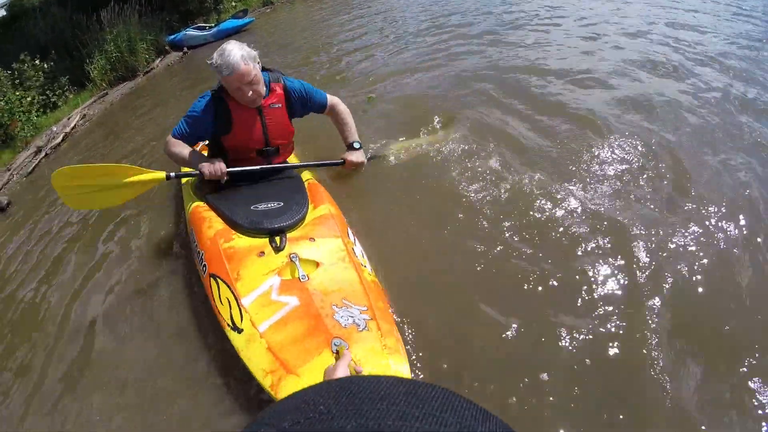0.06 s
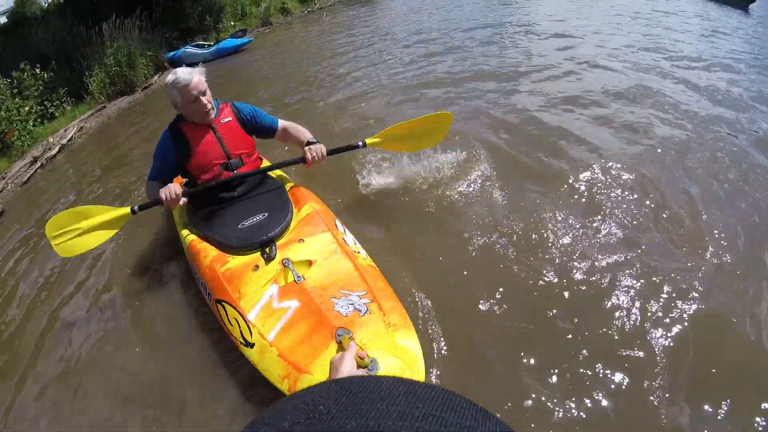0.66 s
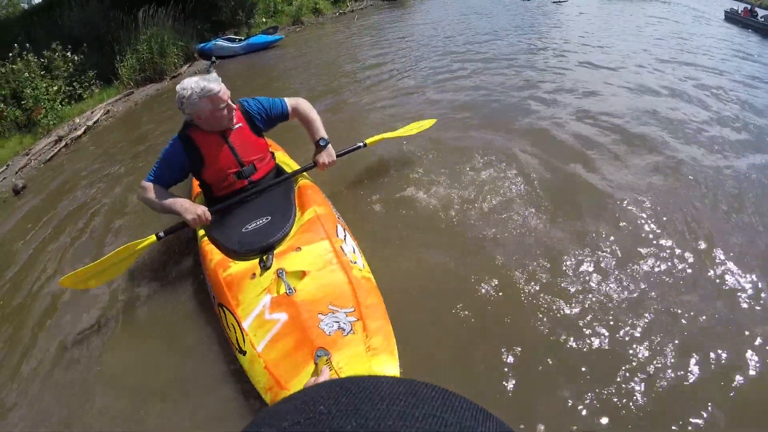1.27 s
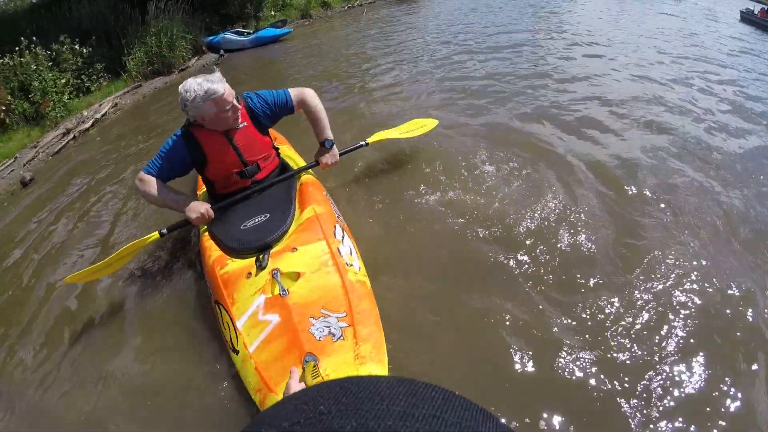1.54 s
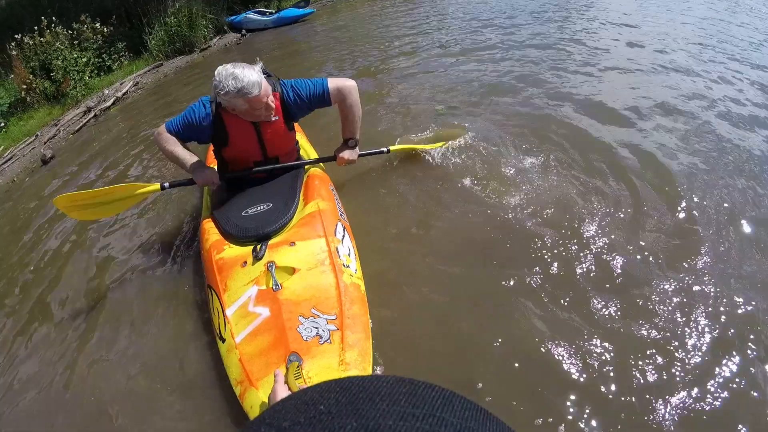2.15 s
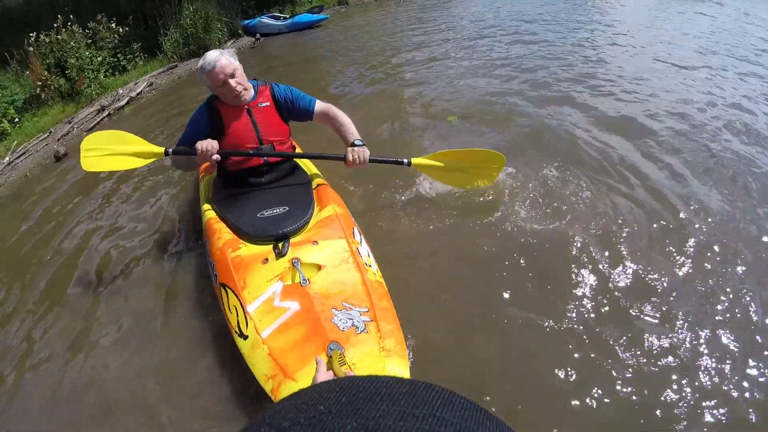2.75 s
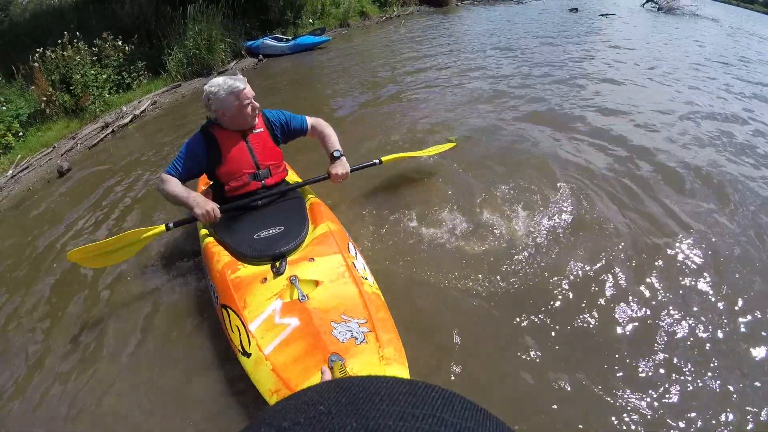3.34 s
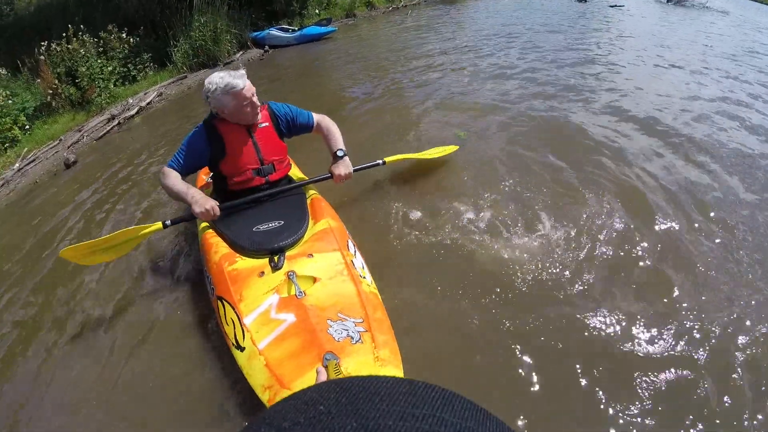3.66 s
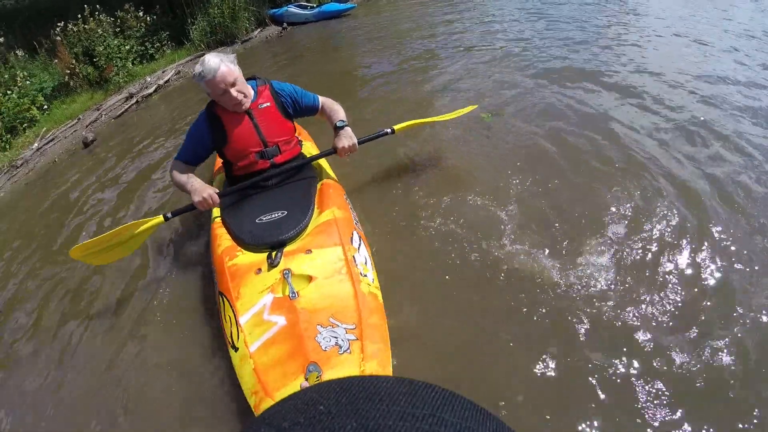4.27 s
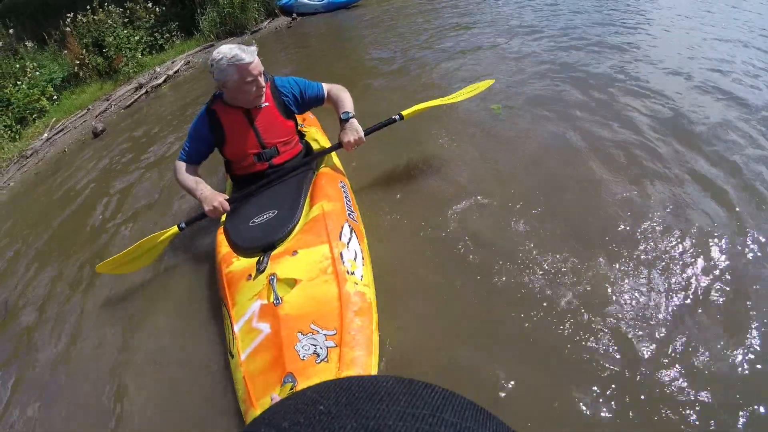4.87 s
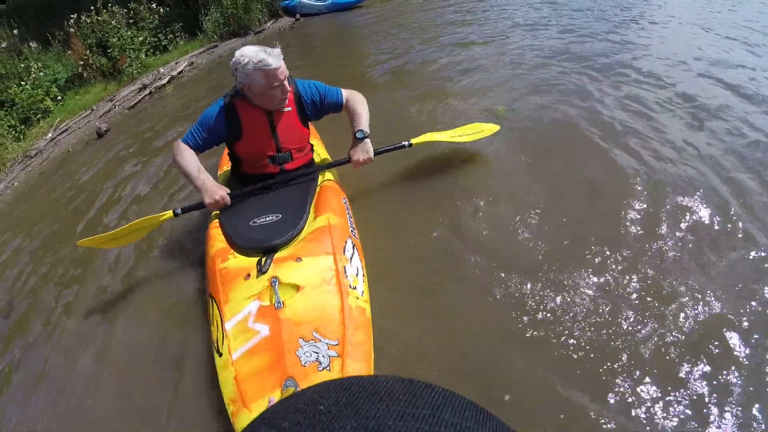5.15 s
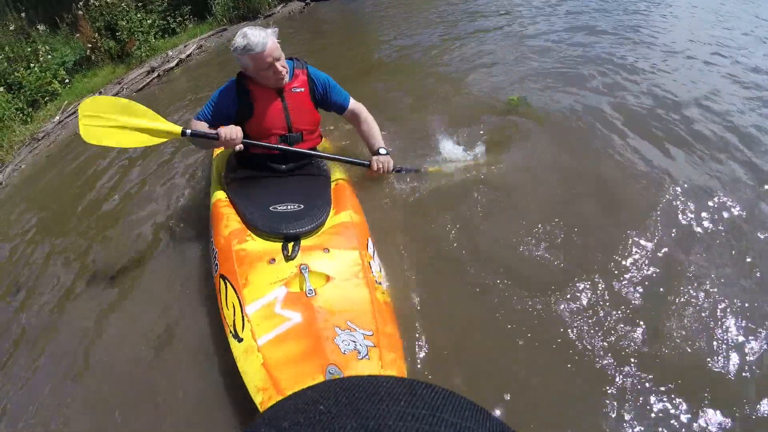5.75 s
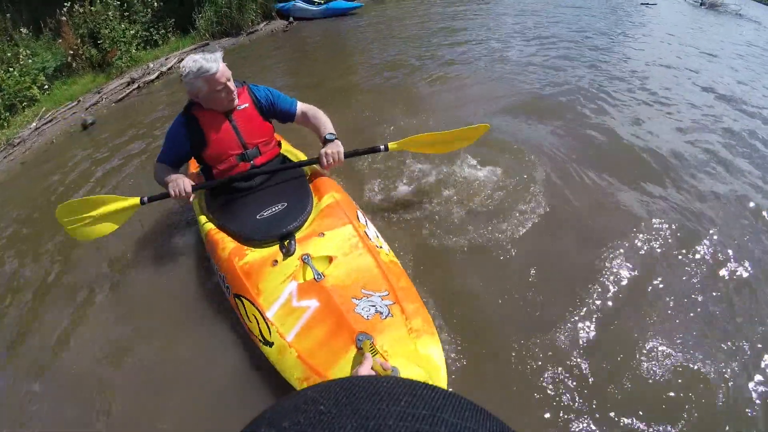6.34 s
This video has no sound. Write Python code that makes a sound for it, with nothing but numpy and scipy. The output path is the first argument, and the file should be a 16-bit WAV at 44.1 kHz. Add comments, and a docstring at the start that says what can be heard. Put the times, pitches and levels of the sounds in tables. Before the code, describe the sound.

A kayak paddle works through shallow river water, heard close up from the bow. The first stroke comes right away, with gulping bubbles, a low knock on the hull and a splash at about 0.5 seconds that trails off in drips. A faint distant motor hums briefly around 1 second. At 2 seconds the paddle clacks, and the second stroke splashes and gurgles until about 3.3 seconds. Drops click sharply on the microphone's case near 3.2 and 3.9 seconds, and water laps softly around 4.5 seconds. Another clack at 5.3 seconds and a sharp drop hit at 5.5 lead into the third, loudest stroke, with a low thump at 5.7 seconds and splashing and dripping to the end, near 6.4 seconds. Throughout, wind buffets the microphone in uneven gusts, over a low distant drone and a soft hiss of river and leaves.

```python
"""A kayaker paddles three strokes through shallow river water, close to a small camera on the bow.
The first stroke opens the scene: the paddle knocks the hull, bubbles resonate, a splash falls and drips.
A far motor hums briefly near 1 s. At 2 s the paddle clacks as it swings down for the second stroke;
from 3 s a few drops strike the camera. Another clack, just after 5 s, leads into the third stroke.
Throughout, wind buffets the microphone over a low drone, and the housing resonates near 5 kHz."""
import sys
import numpy as np
from scipy import signal
from scipy.io import wavfile
from scipy.ndimage import uniform_filter1d

SR = 44100
rng = np.random.default_rng(int(sys.argv[2]) if len(sys.argv) > 2 else 0)


def wrap_up_sound(samples):
    """Save the sound to the file named by the first command line argument, as 16-bit audio."""
    columns = np.atleast_2d(samples).T
    # keep every value between -1 and 1, then stretch to whole-number steps
    tamed = np.clip(columns, -1, 1)
    steps = np.round(tamed * 32767).astype(np.int16)
    wavfile.write(sys.argv[1], SR, steps)


N = 282587
T = np.arange(N) / SR

# the blade tears the water or a wave laps the hull:
# peak_s, splash_db, rise_s, fall_s, churn_relative_db, spray_relative_db
SPLASH_EVENTS = [(0.089, -44, 0.12, 0.13, 5, 0.5), (0.384, -42, 0.09, 0.13, 5.5, -2),
                 (0.49, -35.5, 0.034, 0.041, 3, -6.5), (.82, -52, 0.076, 0.13, 0, 3),
                 (2.14, -56.5, 0.045, 0.18, -10.5, 12), (2.369, -45, 0.033, 0.66, 4, 0.5),
                 (2.48, -42.5, 0.14, 0.072, -3, -3.5), (2.585, -47.5, 0.031, 0.062, 14, -16),
                 (2.94, -42.5, 0.18, 0.092, -18, -4), (3.281, -46, 0.058, 0.092, -12, -4),
                 (3.949, -60.5, 0.42, 0.4, 13.5, 8.5), (4.465, -47, 0.074, 0.037, 2.5, 2),
                 (4.6, -50.5, 0.04, 0.14, 1, 2.5), (5.195, -49, 0.03, 0.016, 11.5, -5),
                 (5.651, -39, 0.16, 0.15, -11, -0.5), (5.728, -35, 0.028, 0.033, -3, 0.5),
                 (5.769, -33.5, 0.046, .03, 4.5, -32), (5.901, -46, 0.014, 0.18, 10.5, 0.5),
                 (6.085, -37.5, 0.052, 0.093, -2.5, 0.5), (6.32, -46, 0.14, 0.85, 4, 1)]


def strokes():
    """Incoherent sources add in power: each splash builds, decays and leaves the water bubbling."""
    calm_db = (-57.5, -60.5, -60)  # the river between strokes: churn, splash, spray
    settle_db, settle_s = -13, 0.59
    power = gain_of(calm_db)[:, None] ** 2 * np.ones(N)
    for peak_s, db, rise_s, fall_s, churn_rel_db, spray_rel_db in SPLASH_EVENTS:
        surge = np.exp(-2 * peak_distance(peak_s, rise_s, fall_s))
        settling = gain_of(settle_db) ** 2 * np.exp(-2 * peak_distance(peak_s, rise_s, settle_s))
        power += gain_of([[db + churn_rel_db], [db], [db + spray_rel_db]]) ** 2 * (surge + settling)
    churn_db, splash_db, spray_db = 10 * np.log10(power)
    return churn(churn_db) + splash(splash_db) + spray(spray_db)


# spectrum of the water behind the blade: frequency_hz, level_db
CHURN_SPECTRUM = [(150, -24.5), (320, 4), (900, 3.5), (2000, -41.5)]


def churn(level_db):
    """Air entrainment: the blade drags under large bubbles, which resonate low and gurgle."""
    cloud = bubbles(269.3, 1168, per_s=340, t60_cycles=18, spread_db=2)
    gurgle = evened(coloured(cloud, CHURN_SPECTRUM)) + gain_of(-16) * noise(CHURN_SPECTRUM)
    return steadied(gurgle, seconds=0.065) * gain_of(level_db + 2)


# spectrum of thrown water landing: frequency_hz, level_db
SPLASH_SPECTRUM = [(500, 3.5), (1000, -2.5), (1700, 0.5), (4000, -10), (7000, -20)]


def splash(level_db):
    """Impact and bubble resonance: thrown water patters back, and small bubbles tinkle."""
    density = crowding(level_db)
    cloud = bubbles(894, 3590, per_s=420 * density, t60_cycles=24, spread_db=4)
    tinkle = steadied(coloured(cloud, SPLASH_SPECTRUM), seconds=0.048)
    landings = gain_of(-1) * patter(per_s=70 * density, t60_s=0.047) * noise(SPLASH_SPECTRUM)
    return steadied(tinkle + landings, seconds=0.043) * gain_of(level_db + 3)


# spectrum of fine droplets: frequency_hz, level_db
SPRAY_SPECTRUM = [(1500, -21.5), (3500, -0.5), (9000, -4), (15000, -11)]


def spray(level_db):
    """Resonant pitch rises as radius falls: the tiniest bubbles fizz between droplet ticks."""
    density = crowding(level_db)
    cloud = bubbles(3310, 11380, per_s=900 * density, t60_cycles=76, spread_db=3.5)
    fizz = gain_of(-5) * steadied(coloured(cloud, SPRAY_SPECTRUM), seconds=0.047)
    ticks = patter(per_s=110 * density, t60_s=0.03) * noise(SPRAY_SPECTRUM)
    return steadied(ticks + fizz, seconds=0.024) * gain_of(level_db - 3.5)


# gulps of trapped air, with short water slaps and a low paddle knock on the hull:
# start_s, level_db, pitch_hz, t60_s
GULPS_AND_KNOCKS = [(.073, -19, 566, 0.028), (0.124, -6.5, 335, 0.011), (.269, -12.5, 312, 0.0099),
                    (0.27, -19.5, 520, 0.073), (.270, -26, 794, 0.053), (0.338, -9.5, 149, 0.074),
                    (.331, -19, 514, 0.09), (.368, -18, 390, 0.061), (.471, -21, 1630, 0.03),
                    (0.5305, -14.5, 830, 0.024), (1.2568, -28.5, 830, 0.045), (2.057, -22, 820, 0.044),
                    (2.197, -29.5, 1390, 0.036), (2.424, -19, 800, 0.013), (2.429, -12, 820, 0.003),
                    (2.568, -22, 800, 0.044), (2.5764, -11, 308, 0.031), (2.595, -18.5, 875, 0.028),
                    (2.594, -15, 477, 0.02), (4.2575, -26, 695, 0.044), (4.43, -15.5, 890, 0.012),
                    (4.528, -25, 690, 0.02), (5.252, -20.5, 863, 0.027), (5.385, -25.5, 2510, 0.01),
                    (5.656, -21.5, 790, 0.057), (5.718, -14, 234, 0.13), (5.73, -3, 119, 0.083),
                    (5.757, -16.5, 870, 0.025), (5.79, -24, 824, 0.044), (5.801, -7, 169, 0.068),
                    (5.852, -10.5, 285, 0.034), (5.87, -11, 314, 0.052), (6.052, -15, 1256, 0.038),
                    (6.1, -20.5, 393, 0.18), (6.24, -8.5, 133, 0.053), (6.249, -15, 304, 0.065)]


def gulps_and_knocks():
    """Damped resonance: each gulp, slap or hull knock is a rising, decaying tone, slightly scattered."""
    direct = np.zeros(N)
    for start_s, db, hz, t60_s in GULPS_AND_KNOCKS:
        ring = bubble(hz, t60_s, octaves_per_s=8, onset_cycles=0.045 * t60_s * hz)
        add(direct, start_s, gain_of(db) * ring)
    scatter = burst(t60_s=0.007) * rng.standard_normal(SR // 8)
    scattered = signal.oaconvolve(direct, scatter / np.linalg.norm(scatter))[:N]
    return direct + gain_of(-16) * scattered


# clacks and scrapes of the paddle: start_s, edge_db, body_db, t60_s
PADDLE_CONTACTS = [(0.1224, -47, -21.5, 0.0059), (2.0579, -33, -33, 0.028), (2.07, -25, -42, 0.016),
                   (2.073, -31.5, -29.5, 0.077), (2.08, -31, -21.5, 0.035), (2.093, -53, -27.5, 0.048),
                   (5.253, -41, -29, 0.0099), (5.258, -18, -23, 0.016), (5.272, -35.5, -46, 0.044),
                   (5.286, -39.5, -35, 0.061)]
# spectra of its bright edge and hollow body: frequency_hz, level_db
EDGE_SPECTRUM = [(800, -22), (5300, -9.5), (7500, -11.5), (15000, -20)]
BODY_SPECTRUM = [(300, -3), (900, -6), (1250, -4), (1750, 8.5), (2650, -4.5), (3200, 2), (8000, -14.5)]


def clacks():
    """Impact excitation: each hard contact sounds the paddle's edge and body, then rebounds once."""
    rebound_s, rebound_db = 0.0065, -5.5
    edge, body = np.zeros((2, N))
    for start_s, edge_db, body_db, t60_s in PADDLE_CONTACTS:
        for delay_s, contact_db in ((0, 0), (rebound_s, rebound_db)):
            add(edge, start_s + delay_s, gain_of(edge_db + contact_db) * burst(t60_s))
            add(body, start_s + delay_s, gain_of(body_db + contact_db) * burst(t60_s))
    bright = gain_of(-0.3) * edge * steadied(noise(EDGE_SPECTRUM), seconds=0.0026)
    hollow = body * steadied(noise(BODY_SPECTRUM), seconds=0.0085)
    return bright + hollow


# drops landing on the water nearby: start_s, strength_db, plop_relative_db
DRIPS = [(0.368, -26.5, 4), (0.535, -22, 2.5), (.725, -30.5, 3), (0.751, -31.5, -7), (0.841, -28, -4),
         (.9594, -33, 1), (.982, -29.5, -13), (1.2114, -30, -15), (2.381, -24.5, 4.5), (2.4794, -27, -6),
         (2.7666, -29, 5.5), (2.856, -28, 0), (3.1383, -31, -2), (3.1921, -26, -14), (3.234, -29.5, 5),
         (3.5551, -29, -7), (3.702, -32, 7.5), (4.293, -28, -13), (5.2214, -36, 10), (5.437, -27, 6.5),
         (5.644, -22, 7.5), (6.074, -17.5, 1.5), (6.1, -24.5, 11)]


def drips():
    """Drop impact: a tick on landing, a short lower plop, and one trapped bubble that plinks."""
    tick, plop, plinks = np.zeros((3, N))
    pitches_hz = rng.uniform(1384, 4220, len(DRIPS))
    for (start_s, db, plop_db), hz in zip(DRIPS, pitches_hz):
        add(plinks, start_s, gain_of(db - 7.5) * bubble(hz, t60_s=0.016))
        add(tick, start_s, gain_of(db - 7) * burst(t60_s=0.009))
        add(plop, start_s, gain_of(db + plop_db - 7) * burst(t60_s=0.02))
    ticks = tick * steadied(noise(SPRAY_SPECTRUM), seconds=0.0043)
    plops = plop * steadied(noise(SPLASH_SPECTRUM), seconds=0.004)
    return ticks + plops + plinks


# drops striking the camera case: start_s, strength_db
CASE_STRIKES = [(3.187, -14), (3.8997, -5), (5.5057, 6), (5.513, -1), (5.9957, -3)]
# response of the struck case: frequency_hz, gain_db
CASE_RESPONSE = [(3500, -11), (5600, -0.5), (8200, -5.5), (12500, -3.5), (15000, -14)]


def case_pings():
    """Impulse response: a drop on the case gives one sharp click, then a brief spatter."""
    strikes = np.zeros(N)
    for start_s, db in CASE_STRIKES:
        strike = gain_of(-20) * burst(t60_s=0.011) * rng.standard_normal(SR // 8)
        strike[0] = 1  # the click ahead of the spatter
        add(strikes, start_s, gain_of(db - 6) * strike)
    return coloured(strikes, CASE_RESPONSE)


# gusts on the microphone: peak_s, strength_db, length_s
WIND_GUSTS = [(.01, -15.5, 0.021), (0.124, -13.5, 0.02), (0.267, -15, 0.036), (0.598, -24.5, 0.028),
              (1.139, -16.5, 0.011), (2.071, -10, 0.007), (2.197, -18, 0.014), (2.42, -15, 0.036),
              (2.493, -12.5, 0.018), (2.87, -18.5, 0.025), (3.62, -18.5, 0.053), (3.96, -19.5, 0.027),
              (4.044, -14, 0.0056), (4.77, -16.5, 0.01), (4.952, -10.5, 0.016), (5.202, -22, .025),
              (5.307, -19.5, 0.024), (5.477, -18.5, 0.057), (5.682, -11.5, 0.042), (5.73, -19, 0.024),
              (5.821, -11.5, 0.038), (6.248, -12.5, 0.011), (6.342, -11.5, 0.052)]


def wind_strength_db():
    """Power summation: bell-shaped gusts, quicker to rise than to fall, ride on a wandering breeze."""
    breeze_db, wander_db, wander_s = -26.5, 2.5, 0.091
    knots_s = np.arange(0, T[-1] + wander_s, wander_s)
    wander = np.interp(T, knots_s, rng.standard_normal(len(knots_s)))
    power = gain_of(breeze_db + wander_db * wander) ** 2
    for peak_s, db, length_s in WIND_GUSTS:
        distance = peak_distance(peak_s, rise_s=0.95 * length_s, fall_s=1.84 * length_s)
        power += gain_of(db) ** 2 * np.exp(-distance ** 2)
    return 10 * np.log10(power)


# spectra of slow wind pressure and of faster eddies: frequency_hz, level_db
RUMBLE_SPECTRUM = [(10, -7.5), (42, 3), (110, -6.5), (400, -39.5), (3000, -81)]
EDDY_SPECTRUM = [(40, -4.5), (160, 12.5), (320, -7.5), (3000, -54)]


def wind():
    """Turbulence: pressure pulses hit the microphone, and strong gusts break into faster eddies."""
    strength_db = wind_strength_db()
    pulses = impacts(per_s=770, spread_db=4.5)
    rumble = steadied(coloured(pulses, RUMBLE_SPECTRUM), seconds=0.26)
    eddies = steadied(coloured(pulses, EDDY_SPECTRUM), seconds=1.0)
    return rumble * gain_of(strength_db - 1.5) + eddies * gain_of(1.305 * strength_db - 10.5)


# glide of a far motor: time_s, pitch_hz, level_db
MOTOR_GLIDE = [(.6, 212.9, -37.5), (.9, 222.9, -34.5), (1.2, 230.7, -41)]


def motor():
    """A periodic source: one rising tone, carried briefly over the water."""
    turns = np.cumsum(curve(MOTOR_GLIDE, column=1)) / SR
    audible = (T > MOTOR_GLIDE[0][0]) & (T < MOTOR_GLIDE[-1][0])
    fade = uniform_filter1d(audible.astype(float), SR // 10)
    return np.sin(2 * np.pi * turns) * gain_of(curve(MOTOR_GLIDE, column=2)) * fade


# slow swell of the distant drone: time_s, level_db
DRONE_SWELL = [(1.7, -35), (3.9, -33), (6.4, -33)]
# spectra of the drone and of river and leaves: frequency_hz, level_db
DRONE_SPECTRUM = [(40, -15), (100, 4.5), (245, -0.5), (330, -20.5), (1500, -97.5)]
RUSTLE_SPECTRUM = [(350, -2.5), (1500, -8.5), (2500, -18.5), (7500, -28), (15000, -48)]


def outdoors():
    """Ambient noise: a low distant drone under the soft broadband hiss of river and leaves."""
    drone = gain_of(curve(DRONE_SWELL, column=1)) * noise(DRONE_SPECTRUM)
    return drone + gain_of(-45.5) * noise(RUSTLE_SPECTRUM)


def bubble(hz, t60_s, octaves_per_s=4.1, onset_cycles=0.03):
    """A damped oscillator that climbs in pitch, as a bubble does when it nears the surface."""
    t = np.arange(int(t60_s * SR) + 1) / SR
    turns = np.cumsum(hz * 2 ** (octaves_per_s * t)) / SR
    onset = 1 - np.exp(-turns / onset_cycles)
    return np.sin(2 * np.pi * turns) * np.exp(-np.log(1000) * t / t60_s) * onset


def bubbles(low_hz, high_hz, per_s, t60_cycles, spread_db, sizes=48):
    """Constant-Q resonators: in a cloud of bubbles of many sizes, the small ones die sooner."""
    clicks = impacts(per_s, spread_db)
    size_index = rng.integers(0, sizes, N)
    rings = [bubble(hz, t60_cycles / hz) for hz in np.geomspace(low_hz, high_hz, sizes)]
    cloud = np.zeros(N)
    for i in np.flatnonzero(clicks):
        add(cloud, i / SR, clicks[i] * rings[size_index[i]])
    return evened(cloud)


def impacts(per_s, spread_db):
    """A Poisson process: random clicks of either sign, many small and a few large."""
    size = gain_of(spread_db * np.minimum(rng.exponential(1, N), 4))
    return size * rng.choice([-1, 1], N) * (rng.random(N) < per_s / SR)


def patter(per_s, t60_s):
    """Shot-noise envelope of rms 1: separate ticks when drops are few, a smooth wash when many."""
    energy = impacts(per_s, spread_db=4.5) ** 2 / per_s
    power = signal.oaconvolve(energy, burst(t60_s) ** 2)[:N]
    return evened(np.sqrt(abs(power)))


def crowding(level_db, reference_db=-49):
    """A power law: harder stirring multiplies the rate of drops and bubbles."""
    return gain_of(level_db - reference_db) ** 1.44


def burst(t60_s, rise_s=0.00016):
    """Exponential decay after a quick onset."""
    t = T[:SR // 8]
    return np.exp(-np.log(1000) * t / t60_s) * (1 - np.exp(-t / rise_s))


def peak_distance(peak_s, rise_s, fall_s):
    """Normalised time from a peak: rise times before it, fall times after."""
    return np.maximum((peak_s - T) / rise_s, (T - peak_s) / fall_s)


def coloured(x, spectrum):
    """Minimum-phase filtering: shapes the spectrum causally, so clicks stay sharp."""
    hz, db = np.transpose(spectrum)
    bins_hz = abs(np.fft.fftfreq(8192, 1 / SR))
    log_gain = np.log(gain_of(np.interp(np.log(bins_hz + 1), np.log(hz), db)))
    response = np.exp(np.conj(signal.hilbert(log_gain)))
    taps = np.fft.ifft(response).real
    return signal.oaconvolve(x, taps[:len(taps) // 2])[:len(x)]


def noise(spectrum):
    """Filtered Gaussian noise of rms 1."""
    return evened(coloured(rng.standard_normal(N), spectrum))


def steadied(x, seconds):
    """Envelope normalisation: holds the running rms at 1 and keeps the faster detail."""
    size = max(int(seconds * SR), 3)
    power = uniform_filter1d(uniform_filter1d(x ** 2, size), size)
    return x / np.sqrt(abs(power) + 1e-12)


def evened(x):
    """Normalisation to rms 1."""
    return x / np.sqrt(np.mean(x ** 2) + 1e-20)


def gain_of(db):
    """Decibels to amplitude."""
    return 10 ** (np.asarray(db) / 20)


def curve(rows, column):
    """Linear interpolation of one column of a timed table."""
    columns = np.transpose(rows)
    return np.interp(T, columns[0], columns[column])


def add(mix, start_s, sound):
    """Superposition of a sound on the mix from start_s."""
    part = mix[max(round(start_s * SR), 0):][:len(sound)]
    part += sound[:len(part)]


def scene():
    """Superposition in open air: water, paddle, wind and background sum at one microphone."""
    paddling = strokes() + gulps_and_knocks() + clacks() + drips() + case_pings()
    return (paddling + wind() + motor() + outdoors())[None]


# transmission through the camera housing: frequency_hz, gain_db
HOUSING_RESPONSE = [(3000, 0.5), (4270, -2.5), (5050, 9.5), (5750, 11), (6450, -2), (10400, -2.5),
                    (11700, -13)]
# spectrum of electronic hiss: frequency_hz, level_db
HISS_SPECTRUM = [(3000, -3.5), (7200, 6.5), (10400, 0.5), (11700, -6)]


def record(dry):
    """Enclosure resonance colours the treble; faint electronic hiss joins before the band limit."""
    cutoff_hz = 15000
    housed = coloured(dry[0], HOUSING_RESPONSE) + gain_of(-59.5) * noise(HISS_SPECTRUM)
    lowpass = signal.firwin(255, cutoff_hz, window=("kaiser", 9), fs=SR)
    return signal.oaconvolve(housed, lowpass, "same")[None]


dry = scene()
out = record(dry)
wrap_up_sound(out)
```